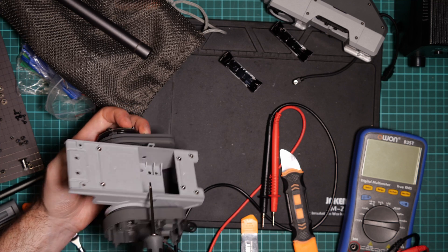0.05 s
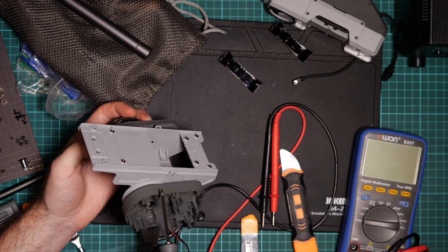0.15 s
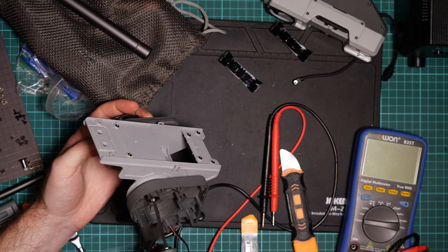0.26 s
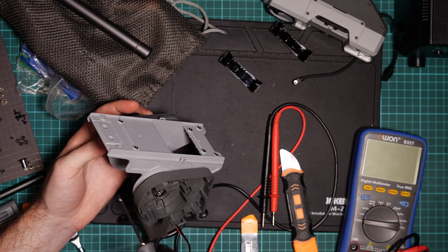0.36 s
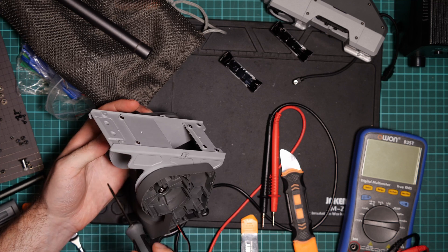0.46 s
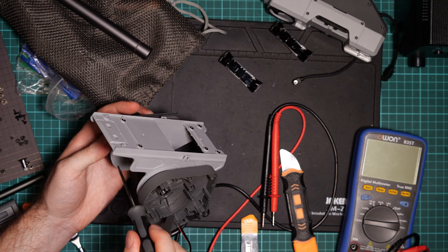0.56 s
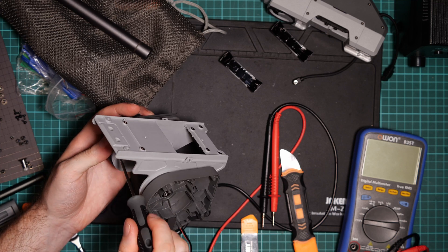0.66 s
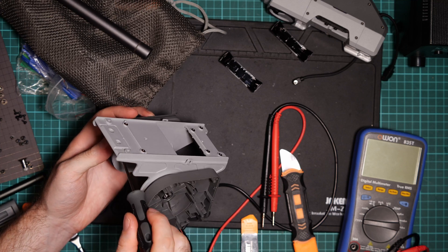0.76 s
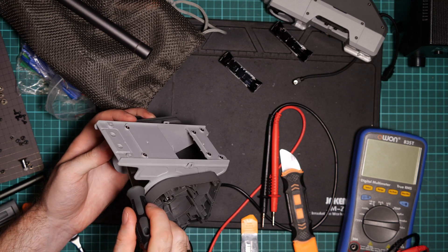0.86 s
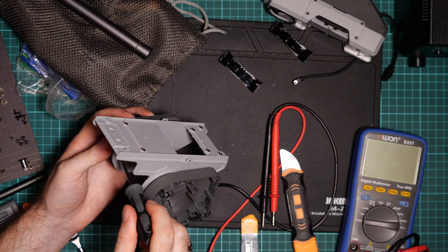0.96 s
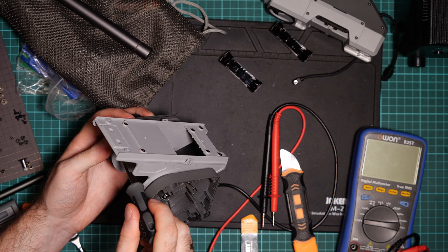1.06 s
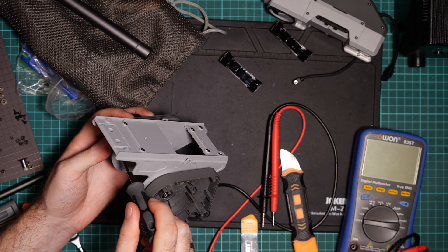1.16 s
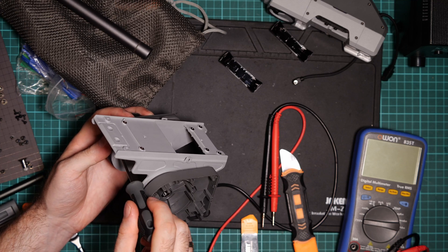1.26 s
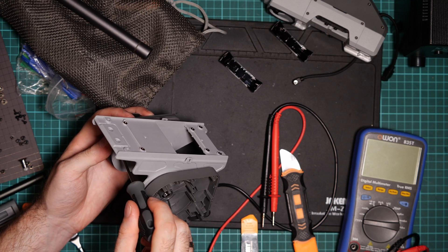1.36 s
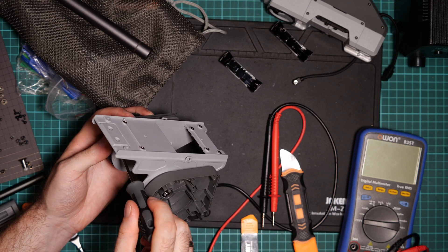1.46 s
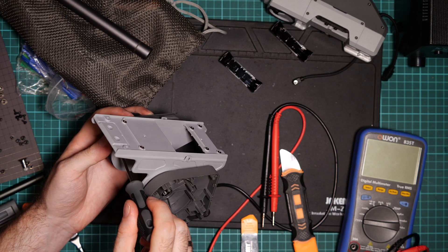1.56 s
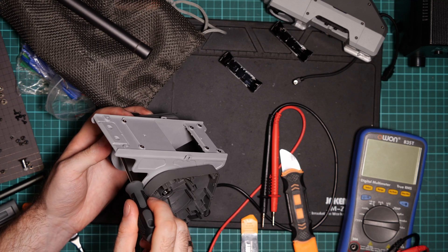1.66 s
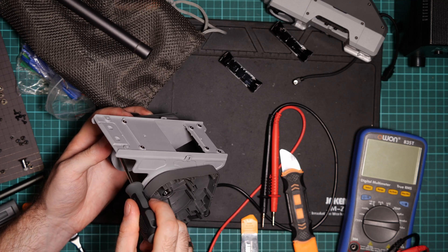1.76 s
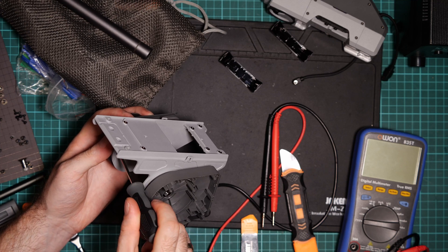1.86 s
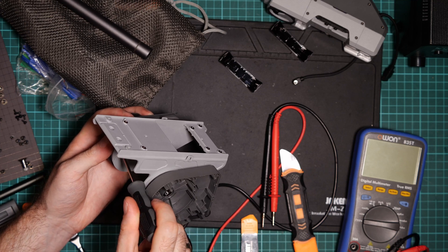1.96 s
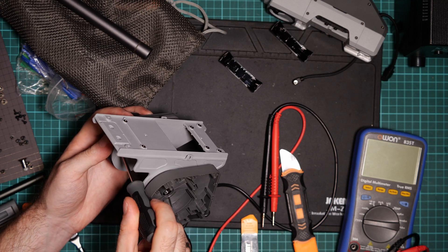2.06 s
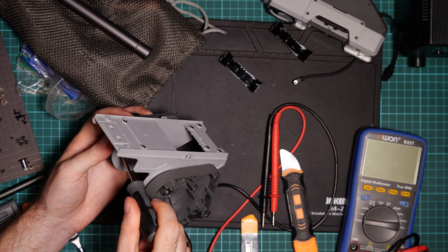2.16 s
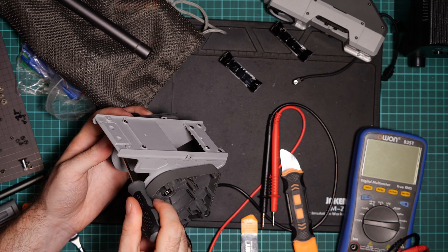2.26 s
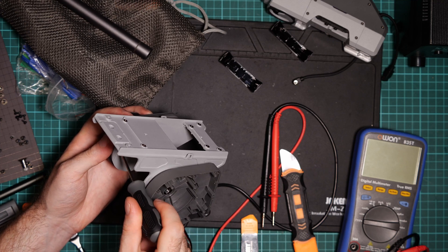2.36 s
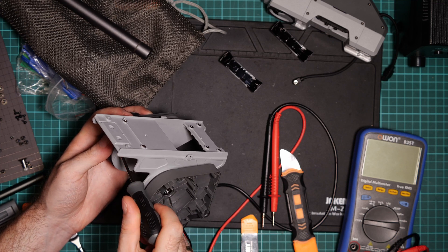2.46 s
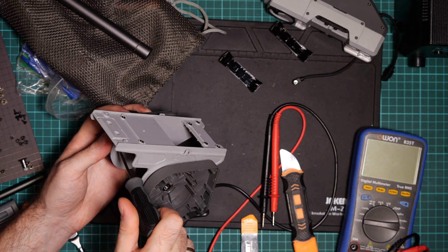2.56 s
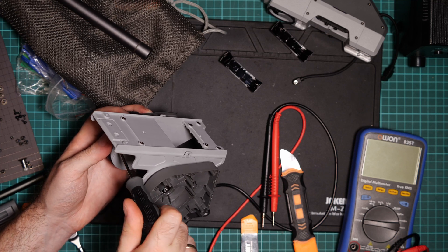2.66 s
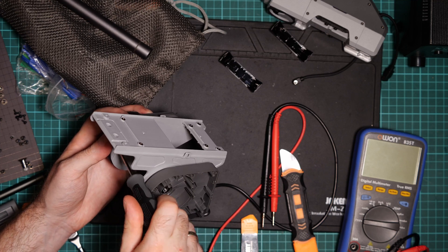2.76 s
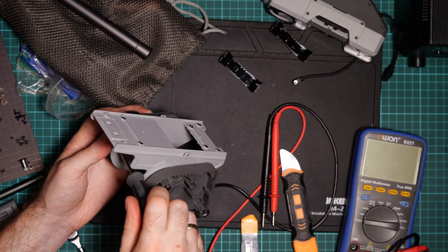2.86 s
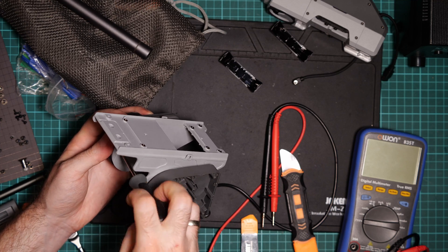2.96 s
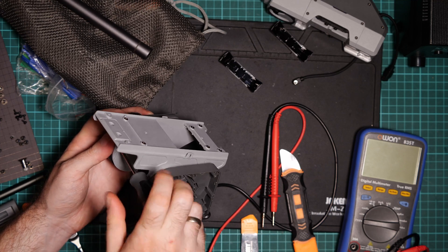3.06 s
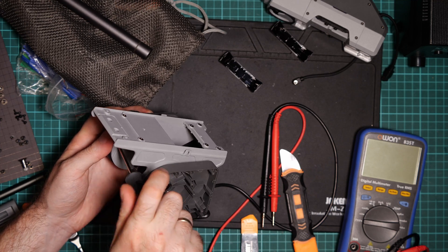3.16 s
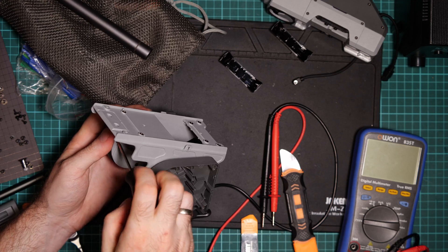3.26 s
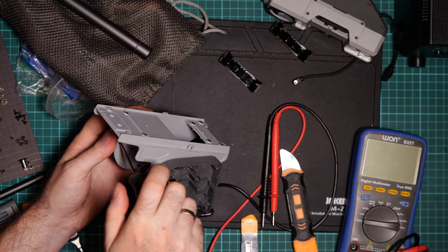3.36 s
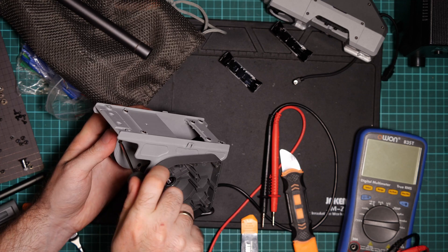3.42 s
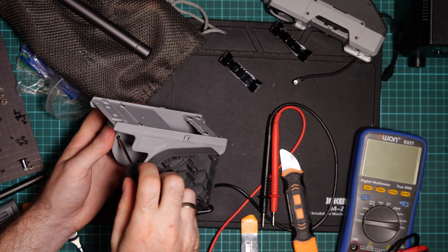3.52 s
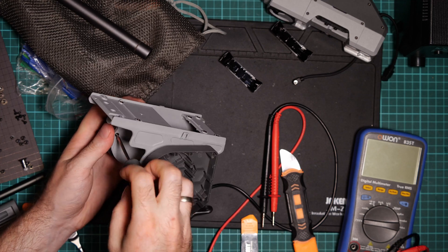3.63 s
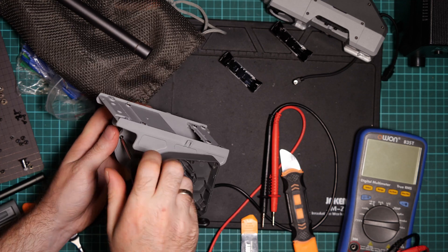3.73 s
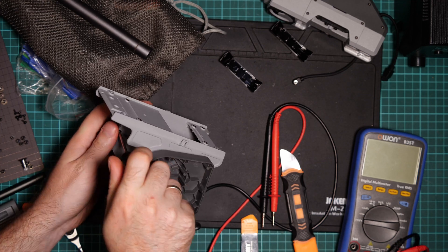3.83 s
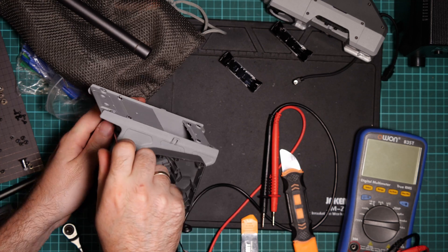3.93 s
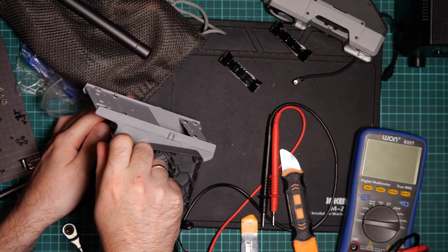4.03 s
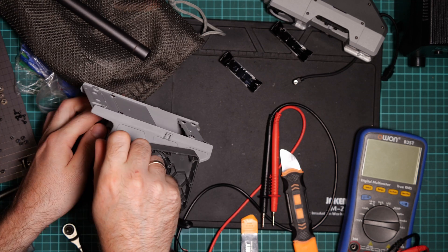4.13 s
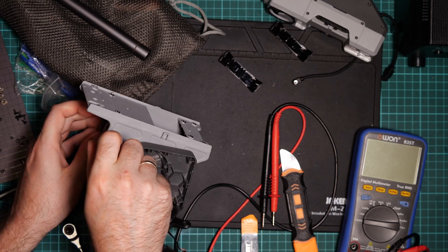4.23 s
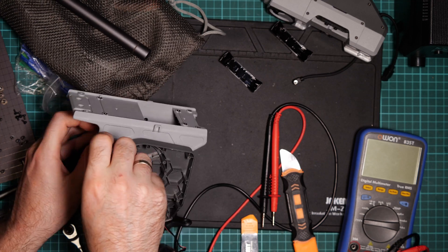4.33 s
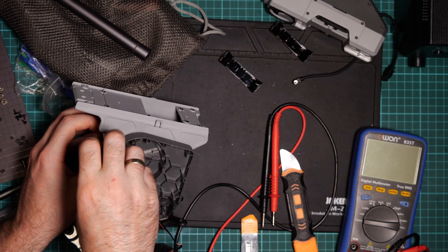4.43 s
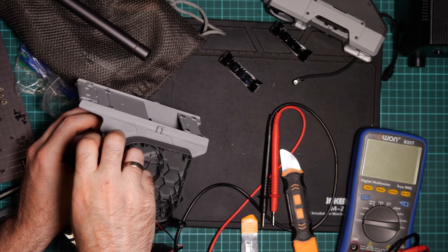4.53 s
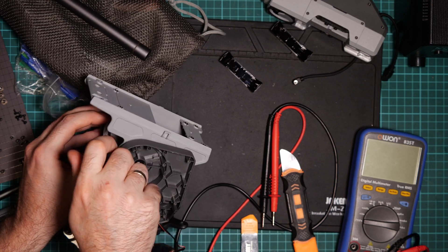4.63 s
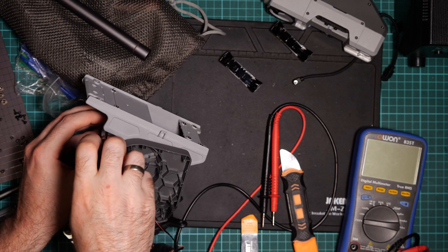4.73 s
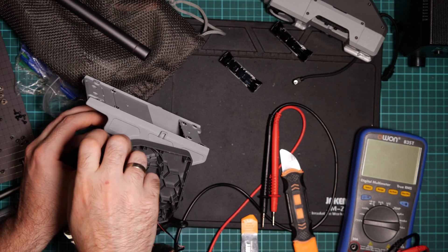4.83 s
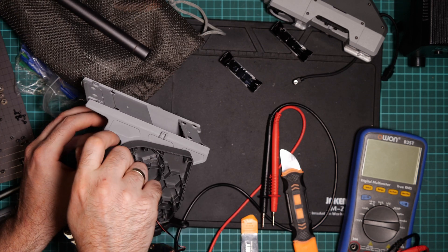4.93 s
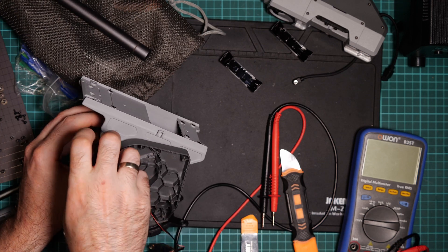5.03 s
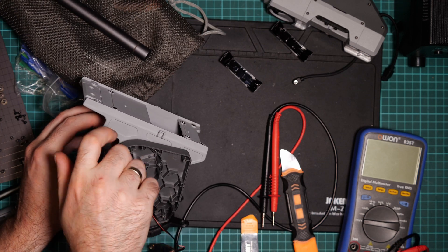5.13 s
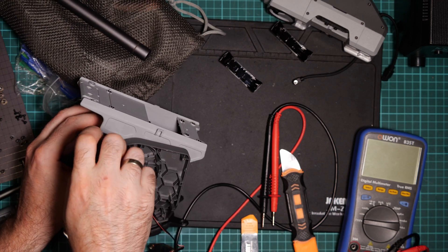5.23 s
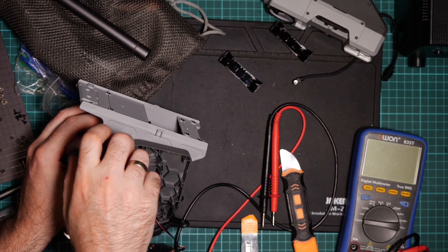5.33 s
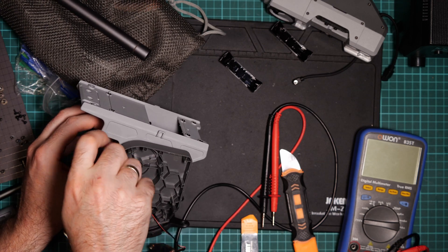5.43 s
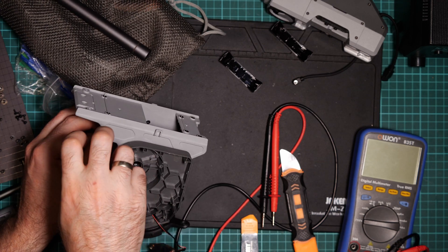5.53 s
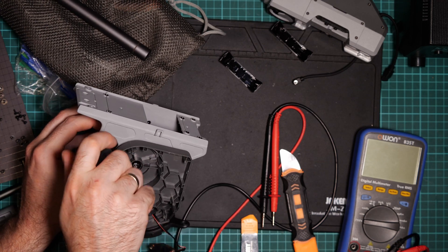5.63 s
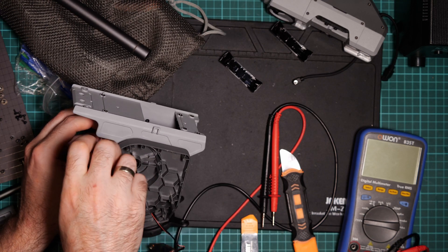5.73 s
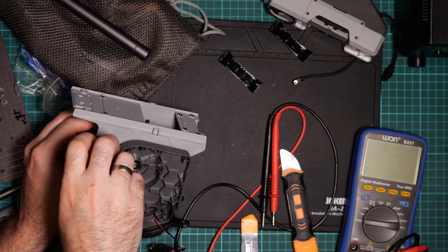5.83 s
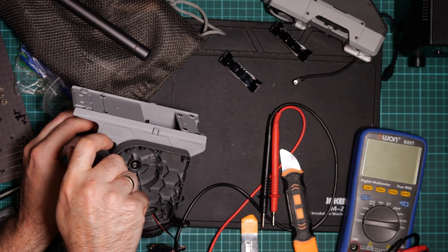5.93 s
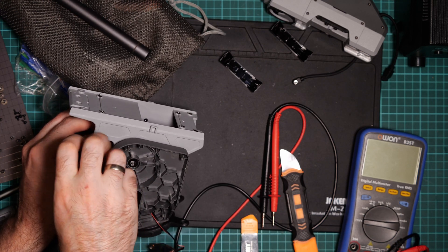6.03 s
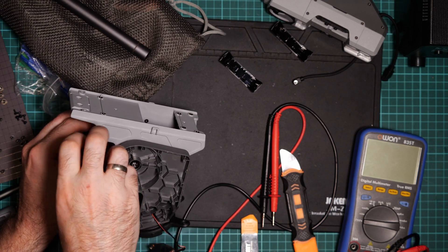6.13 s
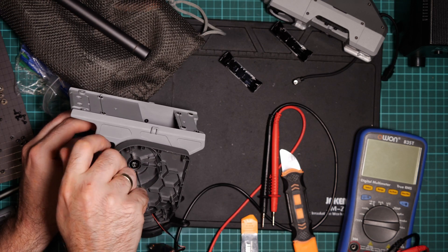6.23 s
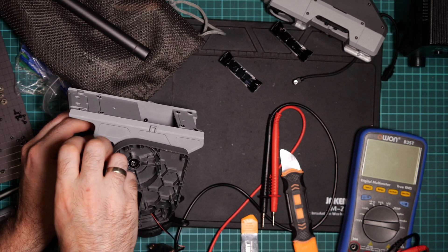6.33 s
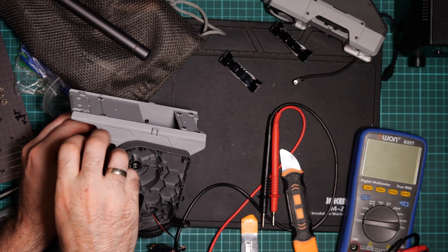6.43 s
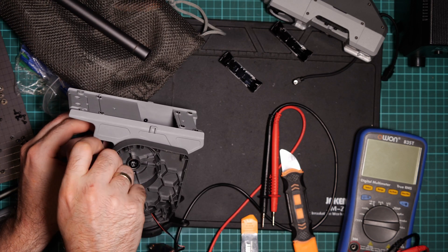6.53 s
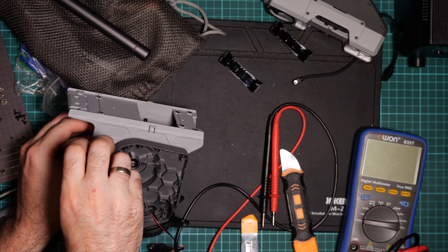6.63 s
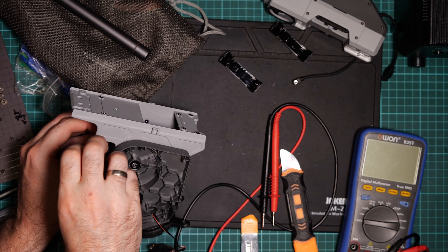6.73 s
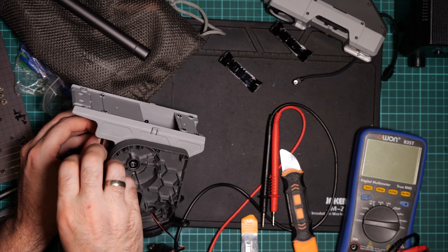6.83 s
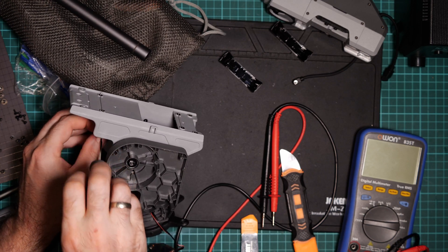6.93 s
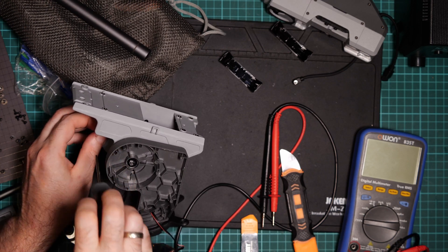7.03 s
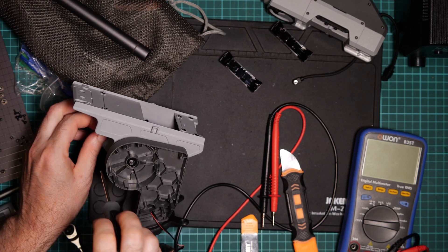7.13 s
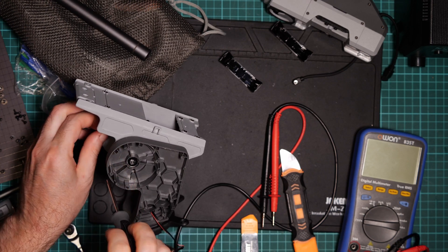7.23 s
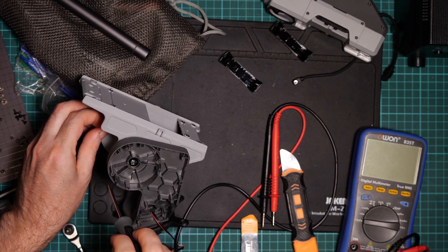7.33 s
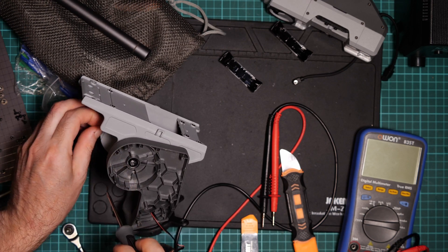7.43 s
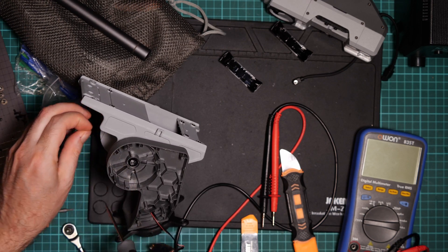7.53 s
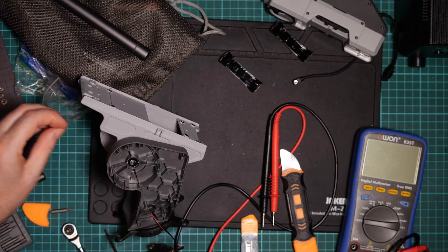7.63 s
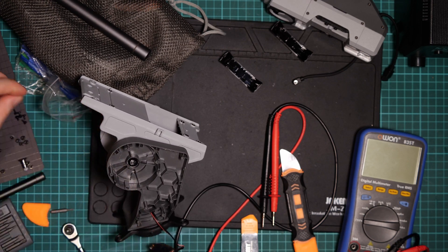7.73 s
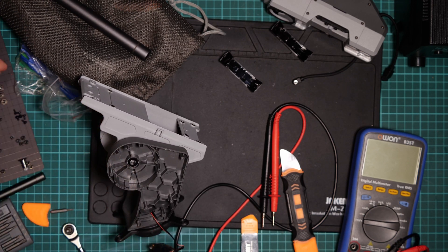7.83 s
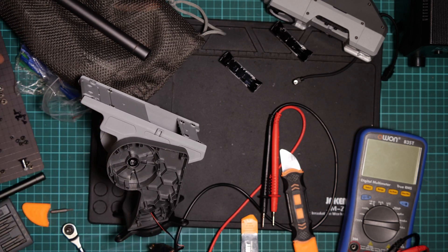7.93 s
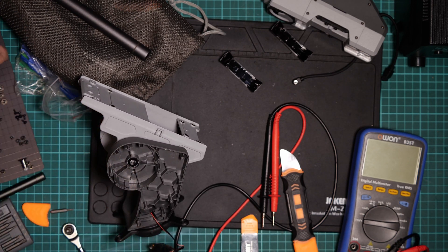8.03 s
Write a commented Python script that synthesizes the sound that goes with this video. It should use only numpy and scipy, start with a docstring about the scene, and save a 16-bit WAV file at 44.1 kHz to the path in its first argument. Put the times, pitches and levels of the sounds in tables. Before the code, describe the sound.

A screwdriver works on a hollow plastic housing at a bench in a small room. Sparse bright metal clicks grow louder, then gritty thread rubs join in. A heavy knock and mat thump land near the middle, followed by busy, irregular plastic clacks and scrapes. A short burst of clicks and a set-down comes late, then near quiet. Close microphone, faint hiss and low room air.

```python
"""At a bench in a small room, a screwdriver backs screws out of a hollow plastic housing on a mat.
Tip snaps, housing knocks and mat thumps are short forces ringing decaying modes; thread rubs are
dense random slips driving the same parts. Sparse echoes make the room's answer; shaped noise makes
air, bench rumble and microphone hiss. The loudest blows overload the input."""
import sys
import numpy as np
from scipy import signal
from scipy.fft import rfft, irfft
from scipy.io import wavfile
from scipy.ndimage import uniform_filter1d

SR = 44100
rng = np.random.default_rng(int(sys.argv[2]) if len(sys.argv) > 2 else 0)


def master(y):
    """Save y as 16-bit WAV."""
    cut = np.clip(np.atleast_2d(y).T, -1, 1)
    pcm = np.round(cut * 32767)  # scale
    wavfile.write(sys.argv[1], SR, pcm.astype(np.int16))


N = 356328


def amp(db):
    """Amplitude factor of a level in dB."""
    return 10 ** (np.asarray(db) / 20)


def evened(x):
    """Signal scaled to unit rms."""
    return x / np.sqrt(np.mean(x ** 2) + 1e-20)


def read(points, hz):
    """Table value at each frequency, interpolated along log frequency."""
    f, value = np.transpose(points)
    return np.interp(np.log(hz + 1), np.log(f + 1), value)


def add(mix, start_s, sound):
    """Mix a sound in at its start time, cut at the end of the mix."""
    part = mix[round(start_s * SR):][:len(sound)]
    part += sound[:len(part)]


def coloured(spectrum):
    """Steady unit-rms noise: white noise weighted by the spectrum."""
    gain = amp(read(spectrum, np.fft.rfftfreq(N, 1 / SR)))
    return evened(irfft(rfft(rng.standard_normal(N)) * gain, N))


# air noise spectrum [f/Hz, relative density/dB per Hz]
AIR_SPECTRUM = [(12, -35), (20, -11), (70, -3.5), (103, -0.5), (298, -5.5), (343, -3.5), (669, -10.5),
                (835, -9.5), (1380, -14), (1720, -11.5), (2280, -16), (15600, -21)]
AIR_RMS_DB = -44.5


def air():
    """Steady room air: noise strongest at low frequencies."""
    return amp(AIR_RMS_DB) * coloured(AIR_SPECTRUM)


# capsule noise spectrum [f/Hz, relative density/dB per Hz]
HISS_SPECTRUM = [(12, -38), (20, -4), (213, -5), (245, -4.5), (582, -4.5), (790, -9), (2550, -8),
                 (15600, -3)]
HISS_RMS_DB = -50


def hiss():
    """Microphone noise, of opposite sign left and right."""
    return amp(HISS_RMS_DB) * coloured(HISS_SPECTRUM) * [[1], [-1]]


# bench shaking under the hands [t/s, rms level/dB]
RUMBLE_LEVEL = [(0.0, -54), (1.08, -52.5), (1.91, -78), (2.25, -52), (2.61, -66), (3.3, -52), (4.05, -52),
                (5.24, -48.5), (6.1, -46), (6.62, -56), (7.3, -53), (8.08, -58)]


def rumble():
    """Slow shaking, mostly below the range of the housing: low noise with a moving level."""
    t_s, level_db = np.transpose(RUMBLE_LEVEL)
    level = amp(np.interp(np.arange(N) / SR, t_s, level_db))
    return level * coloured([(12, -30), (30, 0), (55, -10), (90, -15), (300, -70)])  # f/Hz, dB


# change of each mode under a firmer grip, by part [relative level/dB]
FIRM_GRIP_DB = {"shell": [-2, -6, -3, -4, -7, 0.5, 4], "cavity": [2, -6, 2.5]}
TWISTING_START_S, TWISTING_END_S = 2.6, 7.0  # firmer grip outside this span


def held(t_s):
    """Mode weights of each part: a firmer grip shifts the balance inside shell and cavity."""
    firm = not TWISTING_START_S < t_s < TWISTING_END_S
    shell = amp(firm * np.array(FIRM_GRIP_DB["shell"]))
    cavity = amp(firm * np.array(FIRM_GRIP_DB["cavity"]))
    return [1, shell, cavity, 1, 1, 1, 1]


def rings(modes):
    """Decaying sine per mode, one a row, high-passed below the lowest mode of the part."""
    hz, db, t60_s = np.transpose(modes)[:, :, None]
    t = np.arange(0, t60_s.max(), 1 / SR)
    # removes the low thump of the abrupt start
    low_cut = signal.butter(2, .7 * hz.min(), "high", fs=SR, output="sos")
    sign = (-1) ** np.arange(len(modes))[:, None]  # opposite neighbours fill the valleys between
    decaying = sign * amp(db - 60 * t / t60_s) * np.sin(2 * np.pi * hz * t)
    return signal.sosfilt(low_cut, decaying)


# modes of bench mat, plastic shell, enclosed air, walls, ribs, steel shaft and tip
# [f/Hz, relative level/dB, t60/s]
MAT_MODES = [(223, -3.5, 0.036), (312.6, -3, 0.05), (457.4, 0, 0.049)]
SHELL_MODES = [(500.4, -5, 0.033), (694.6, -2, 0.068), (729, -5, 0.073), (823, 3.5, 0.031), (952, 0, 0.044),
               (1042, 5, 0.025), (1361, -3, 0.023)]
CAVITY_MODES = [(1440, -6, .018), (1600, 0, .038), (1770, -7, .016)]
WALL_MODES = [(1926, 1.5, 0.014), (2140, -2.5, 0.029), (2242, 3, 0.017), (2746, 3, 0.0069)]
RIB_MODES = [(3030, -3.5, 0.023), (3288, 0.5, 0.013), (3654, -5, 0.018), (3908, -3, 0.011),
             (4800, -2.5, 0.0032)]
SHAFT_MODES = [(5500, 4, 0.0026), (6455, -9, 0.015), (6856, -7.5, 0.0094), (8050, 4.5, 0.0018),
               (8980, -4.5, 0.0036)]
TIP_MODES = [(9540, 5.5, 0.001), (12100, -6, 0.0027), (12700, -9, 0.004), (14600, -8.5, 0.0028)]
PARTS = (MAT_MODES, SHELL_MODES, CAVITY_MODES, WALL_MODES, RIB_MODES, SHAFT_MODES, TIP_MODES)
# dull knock of the housing plus bright snap of the steel
# [t/s, knock level/dB, added cavity level/dB, snap level/dB, bite/step]
# bite: step that rings most, 0 walls, 1 ribs, 2 shaft, 3 tip
BLOW_EVENTS = [(0.096, -44.5, 11, -39, 0.5), (0.182, -31.5, -1, -34.5, 2), (0.659, -21.5, 2.5, -23.5, 2.1),
               (0.906, -14.5, 5, -5, 0.44), (0.98, -25.5, -4, -13.5, 1.1), (1.005, -25, 3, -14.5, 1),
               (1.038, -34, 5, -18, 0.3), (1.066, -46, 12, -22, 0.3), (1.096, -35, 7, -13.5, 0.96),
               (1.384, -29.5, 0, -24, 0.4), (1.799, -27, 0, -23, .2), (1.807, -18, 0, -4.5, 1.36),
               (1.949, -43, 12, -33, 2), (1.97, -11, 3.5, -13, 0.65), (1.993, -18, -7, -7, 1.3),
               (2.074, -45, -4, -32, 1.3), (2.25, -11, -0.5, -2.5, 1.42), (2.421, -15.5, 4, 5.5, 3),
               (2.724, -11.5, -7, -15, 0.3), (2.993, -14, 2, -7.5, 0), (3.017, -20.5, -6, -19.5, 2.8),
               (3.063, -16, 10.5, -12.5, 2.53), (3.305, -9.5, 8.5, -10.5, 1.4), (3.364, -22, 0.5, -31, 3),
               (3.594, -18.5, 4, -10, 2.1), (3.754, -27.5, -7, -37, 1), (3.944, -5, -8.5, -12, 2.9),
               (3.996, 9.5, -9.5, 1.5, 1.1), (4.025, -19, 9, -13.5, 1.8), (4.1, -28, 5, -19, 2.5),
               (4.113, -22, -9, -14.5, 2.15), (4.127, -28, -5, -20, 1.6), (4.148, -42, -5, -22, 1.6),
               (4.194, -49, -5, -12, 1.55), (4.226, -37, 2, -18, 1.7), (4.29, -34.5, 0, -24, 2.5),
               (4.317, -24, -7, -31, -1), (4.33, -13, -27, -39, .4), (4.349, -37, 1, -25, 1.5),
               (4.404, -29, -3, -15, -0.54), (4.43, -34, 19, -20, 0.7), (4.451, -15, -5, -19.5, 1),
               (4.664, -13.5, 7, -10, 0.9), (4.699, -36, 12, -30, 1.5), (4.724, -15.5, 3, -5, -1.57),
               (4.777, -15, -9, -23, 0), (4.804, -4, -9, -29, 4), (5.022, -18, -3, -30, -3),
               (5.132, -17.5, 8, -21, -0.9), (5.226, -26, -13, -40, 4), (5.272, -20, 8, -26, 0),
               (5.369, -17, 10, -17.5, 3), (5.465, -30.5, -3, -27, 3), (5.514, -24, -1, -30, 2.5),
               (5.531, -20, -8, -16.5, 1.1), (5.641, -14.5, 11, -17, 2.5), (5.723, -23.5, -6, -30.5, 3),
               (5.767, -19, 10, -27, 1), (5.905, -20, 8.5, -31, 2), (6.005, -22.5, 6.5, -34, 0.5),
               (6.038, -10.5, -20, -7, 0.86), (6.246, -12.5, 8.5, -18.5, 3), (6.336, -28, -5, -22.5, 3),
               (6.381, -9.5, -11, -14, 1.5), (6.459, -36, -6, -34, -1.5), (7.115, -36.5, 3, -33, 2.3),
               (7.179, -13.5, -25, -19, 0.5), (7.262, -25, -15, -31, 3), (7.346, -17, 4, -13, -1.1),
               (7.387, -16.5, -4, 1, 1.8), (7.397, -32, -6, -5.5, 2.6), (7.45, -29, 3, -4.5, 2.5),
               (7.987, -39.5, 7, -35, .6), (8.06, -20, -4, -26.5, 3)]
# share of each part in a knock, in the order of PARTS [level/dB]
KNOCK_SHARE_DB = [-19.5, -1, -2.5, -6, -13.5, -13, -24.5]
# share of walls, ribs, shaft, tip in a snap [level/dB]
SNAP_SHARE_DB = [0.5, 0, 0, -1.5]
FALL_BELOW_DB, FALL_ABOVE_DB = 2.5, 9  # loss per squared step from the bite
CONTACT_MS = 1.25  # time constant of the chatter
TRAIL_DB, TRAIL_T60_S = -15.5, 0.11  # faint noisy force after a contact
DETUNE = .03  # relative spread: hands bend and hold the parts differently at each blow


def blow_force(rattle):
    """One sharp contact inside a few ms of chatter; a faint noisy force dies away after it."""
    t = np.arange(len(rattle)) / SR
    u = t / (CONTACT_MS / 1000)
    force = rattle * u * np.exp(-u)
    force[np.argmax(u > .6)] += 1.1 * np.linalg.norm(force)
    trail = (1 - np.exp(-u)) * amp(TRAIL_DB - 60 * t / TRAIL_T60_S)  # lengthens the ring
    return force + rattle[::-1] * trail


def blows():
    """Contact forces ring every part; random landing points vary the mode shares."""
    out = np.zeros(N)
    step = np.arange(4)
    for t_s, knock_db, cavity_db, snap_db, bite in BLOW_EVENTS:
        force = blow_force(rng.standard_normal(4000))
        place, bend = rng.standard_normal((2, 8))
        share = amp(1.8 * place)
        knock_part_db = knock_db + np.array(KNOCK_SHARE_DB)
        knock_part_db[2] += cavity_db
        fall_db = np.where(step < bite, FALL_BELOW_DB, FALL_ABOVE_DB) * (step - bite) ** 2
        snap = amp(snap_db + np.array(SNAP_SHARE_DB) - fall_db)
        gains = np.hypot(amp(knock_part_db), np.r_[0, 0, 0, snap])
        for gain, part, weight in zip(gains, PARTS, held(t_s)):
            bent = np.array(part, dtype=float)
            if part is not CAVITY_MODES:  # the cavity keeps its pitch
                bent[:, 0] *= 1 + DETUNE * bend[:len(part)]
            ring = signal.fftconvolve(weight * share[:len(part)] @ rings(bent), force)
            add(out, t_s - .0008, gain * ring / abs(ring).max())  # chatter leads the sharp contact
    return out


# decay of the room [f/Hz, t60/s]
ROOM_DECAY = [(150, 0.35), (500, 0.14), (1500, 0.14), (4000, 0.22), (9000, 0.19), (15000, 0.21)]
ROOM_DB = -8


def room_tail():
    """Unit-energy sparse echoes of random sign, each band dying at its own speed."""
    taps = np.zeros(SR // 2)
    at = np.arange(260, SR // 2 - 16, 16)
    taps[at + rng.integers(0, 16, len(at))] = rng.choice([-1., 1.], len(at))
    hz, t, bands = signal.stft(taps, SR, nperseg=128)
    decay = amp(-60 * t / read(ROOM_DECAY, hz)[:, None])
    tail = signal.istft(bands * decay, SR, nperseg=128)[1]
    return tail / np.linalg.norm(tail)


def room(work):
    """Small-room answer: three echo tails take turns at constant total power."""
    out = np.zeros(N)
    turn = 2 * np.pi * 1.7 * np.arange(N) / SR
    for k in range(3):
        window = np.sqrt(2 / 3) * np.cos(turn + k * np.pi / 3)
        out += signal.oaconvolve(work * window, room_tail())[:N]
    return amp(ROOM_DB) * out


# low modes of the bench top [f/Hz, relative level/dB, t60/s]
BENCH_MODES = [(72.5, -12, 0.083), (120.5, -3, 0.12), (169, 1.5, 0.047)]
# a hand or the housing lands [t/s, bench peak level/dB, push/ms, mat peak level/dB]
THUMP_EVENTS = [(0.122, -23, 12, -48), (0.177, -30, 3.2, -43), (3.93, -13.5, 6.9, -12), (3.991, -12, 4, -1),
                (4.039, -32, 4, -9.5), (4.1, -32.5, 7.4, -26), (4.326, -47, 3.5, -20.5),
                (4.55, -30, 7.3, -36), (4.804, -31, 3.05, -14.5), (5.056, -39, 8.4, -42),
                (7.175, -25.5, 3.3, -13.5), (7.198, -41, 5.4, -23), (8.05, -40, 4, -25.5)]
MAT_PUSH_MS = 1.27


def push(ms):
    """Soft rounded force pulse."""
    return np.hanning(round(ms * SR / 1000))


def thumps():
    """A soft push into the low bench modes; as it ends, a quick one into the mat."""
    out = np.zeros(N)
    bench = rings(BENCH_MODES).sum(0)
    mat = signal.fftconvolve(rings(MAT_MODES).sum(0), push(MAT_PUSH_MS))
    for t_s, bench_db, push_ms, mat_db in THUMP_EVENTS:
        ring = signal.fftconvolve(bench, push(push_ms))
        add(out, t_s, amp(bench_db) * ring / abs(ring).max())
        add(out, t_s + push_ms / 1000, amp(mat_db) * mat / abs(mat).max())
    return out


# strokes; a peak past the end is cut off while rising, an end before the start is silent
# [start t/s, peak t/s, end t/s, shell drive level/dB,
#  then over the shell, before part offsets: cavity/dB, walls and ribs/dB, shaft and tip/dB]
RUB_STROKES = [(0.7, 0.73, 0.86, -47.5, 6.5, 4.5, -8), (0.77, 0.875, 0.87, -39, -3, -4, -7.5),
               (0.97, 0.996, 1.02, -37, 3, 10, -2), (1.025, 1.084, 1.11, -38, 2, 2, -11),
               (1.34, 1.374, 1.37, -38, -6, 3, -14), (2.662, 2.725, 2.8, -42.5, 5.5, -3, -17),
               (2.747, 2.793, 2.86, -35, -3.5, -6, -22), (2.863, 2.957, 3.01, -28, -0.5, -5.5, -15),
               (2.948, 2.997, 3.1, -25, 1, 3.5, -9), (3.145, 3.157, 3.29, -32, 0.5, -6.5, -23),
               (3.243, 3.262, 3.4, -48.5, 1, 5, 0), (3.382, 3.409, 3.5, -39.5, 1.5, -9, -23),
               (3.503, 3.566, 3.745, -30, 6, -2.5, -13), (3.583, 3.647, 3.74, -42, -15, -20, -10),
               (3.808, 3.884, 3.9, -35, -7, -4, -9), (3.9, 3.948, 3.97, -20.5, -2.5, -5.5, -15),
               (3.935, 3.986, 3.99, -18, -9, -12, -14), (4.052, 4.062, 4.26, -33.5, 0, 2.5, -2),
               (4.166, 4.203, 4.38, -46, 0, 3, 9), (4.35, 4.401, 4.53, -35, -5, 1, -5.5),
               (4.423, 4.456, 4.57, -27.5, 1.5, -12, -13.5), (4.518, 4.547, 4.62, -35.5, -3, -2.5, -8.5),
               (4.727, 4.742, 4.89, -24.5, 4, -2.5, -12.5), (4.92, 4.944, 4.99, -41, -5, -5, -16),
               (4.991, 5.052, 5.167, -25, 9, -1, -6.5), (5.233, 5.301, 5.345, -27.5, 9.5, 5.5, -2),
               (5.536, 5.548, 5.62, -32, -12, 4, -5.5), (5.566, 5.586, 5.54, -40, -16, -8, -19),
               (5.635, 5.677, 5.68, -31, -3, -9, -19), (5.753, 5.796, 5.84, -24, 2, 3.5, -2),
               (5.92, 5.95, 5.94, -34, -11, -13, -24), (6.057, 6.08, 6.17, -37, -10, -1.5, -6),
               (6.26, 6.267, 7.04, -50, -7, 3, -13), (6.63, 6.698, 6.74, -39, -8, 1, -2.5),
               (6.787, 6.824, 6.58, -36, -4, 0.5, -6), (7.134, 7.151, 7.185, -20.5, -9.5, -0.5, -5),
               (7.154, 7.195, 7.3, -32.5, -12, -5, -3), (7.77, 7.826, 7.89, -47.5, -3, 0, -13),
               (8.045, 8.052, 8.075, -31, -9, -12, -15)]
STROKE_START_DB, STROKE_END_DB = -17.5, -20  # pressure re stroke peak
BRIGHTEN = 0.24  # extra dB per dB of pressure, cavity and higher parts
SLIPS_PER_S = 6000


def thread_slips():
    """Dense slips of uneven size under a fluttering pressure, at unit rms."""
    flutter = amp(2.04 * evened(uniform_filter1d(rng.standard_normal(N), 260)))
    size = amp(2.8 * np.minimum(rng.exponential(1, N), 4))
    happens = rng.random(N) < SLIPS_PER_S / SR
    return evened(flutter * rng.standard_normal(N) * size * happens)


def rubs():
    """Slips of the thread or a finger shake the parts as pressure swells and fades."""
    out = np.zeros(N)
    slips = thread_slips()
    part_rings = [rings(part) for part in PARTS]
    for start_s, peak_s, end_s, level_db, cavity_db, ribs_db, shaft_db in RUB_STROKES:
        place = rng.standard_normal(8)
        stroke = slips[round(start_s * SR):round(end_s * SR)]
        t = start_s + np.arange(len(stroke)) / SR
        pressure_db = np.interp(t, [start_s, peak_s, end_s], [STROKE_START_DB, 0, STROKE_END_DB])
        fade = signal.windows.tukey(len(stroke), .12)
        stroke = stroke * fade * amp(level_db + pressure_db)
        shares_db = (-12.5, 0, cavity_db, ribs_db - 2.5, ribs_db - 3.5, shaft_db, shaft_db - 10.0)
        for k, (modes, share_db, weight) in enumerate(zip(part_rings, shares_db, held(start_s))):
            ring = weight * amp(2.5 * place[:len(modes)]) @ modes
            drive = stroke * amp(share_db + (k > 1) * BRIGHTEN * pressure_db)
            add(out, start_s, signal.fftconvolve(drive, ring / np.linalg.norm(ring)))
    return out


def scene():
    """Work sounds, their room answer, air and rumble, alike on both channels."""
    work = blows() + thumps() + rubs()
    return np.tile(work + room(work) + air() + rumble(), (2, 1))


EDGE_HZ = 15750


def record(dry):
    """Capsule hiss, hard overload, then a low-pass band limit."""
    clipped = np.clip(dry + hiss(), -1, 1)
    band_limit = signal.firwin(511, EDGE_HZ, window=("kaiser", 9), fs=SR)
    return signal.oaconvolve(clipped, band_limit[None], "same")


dry = scene()
out = record(dry)
master(out)
```